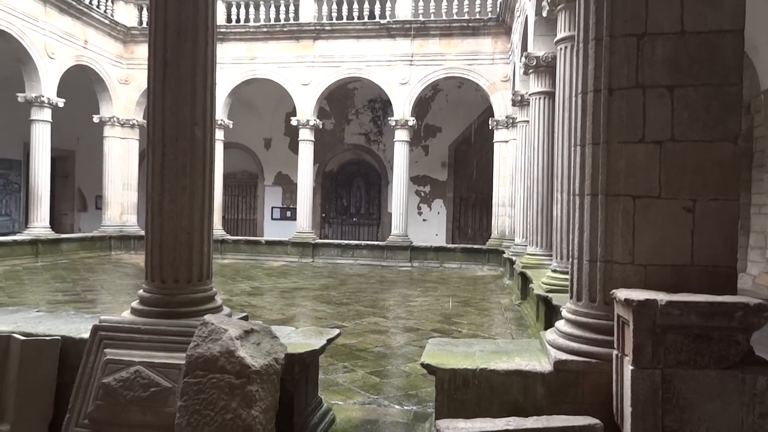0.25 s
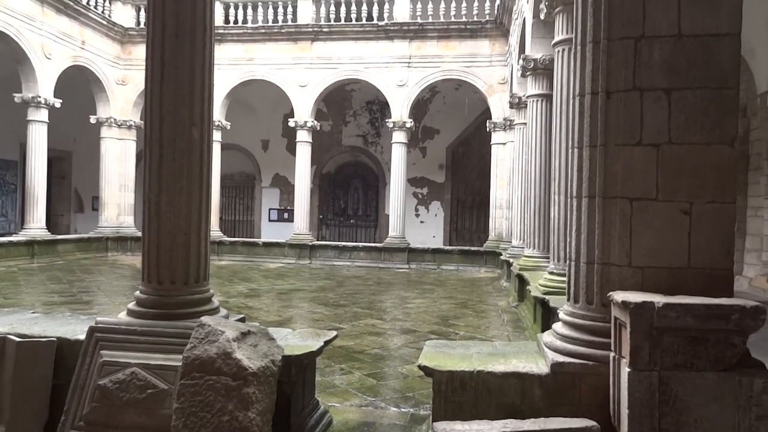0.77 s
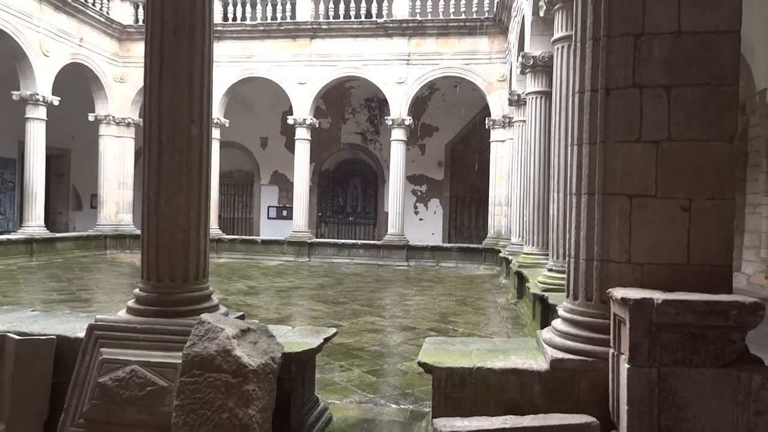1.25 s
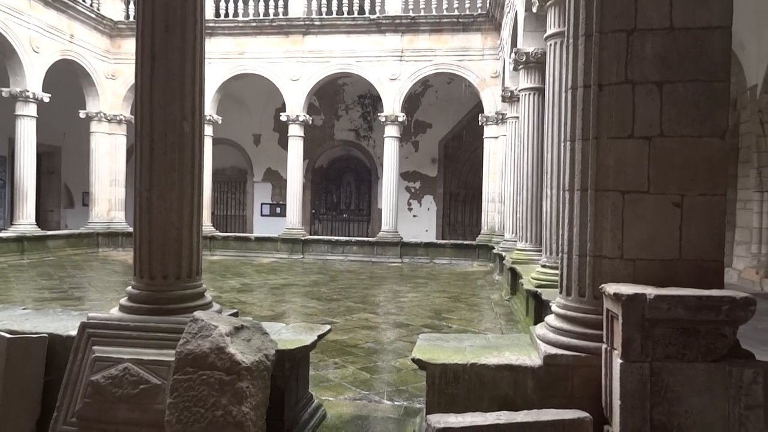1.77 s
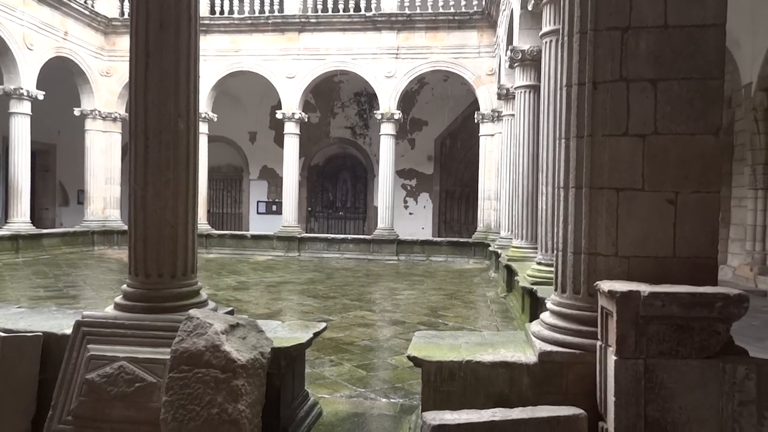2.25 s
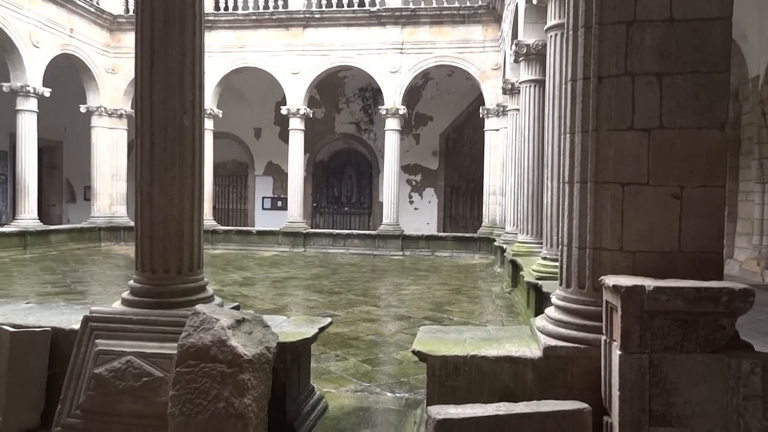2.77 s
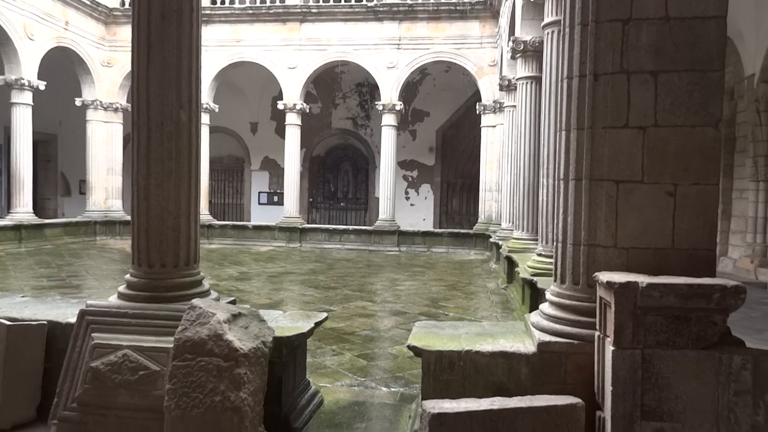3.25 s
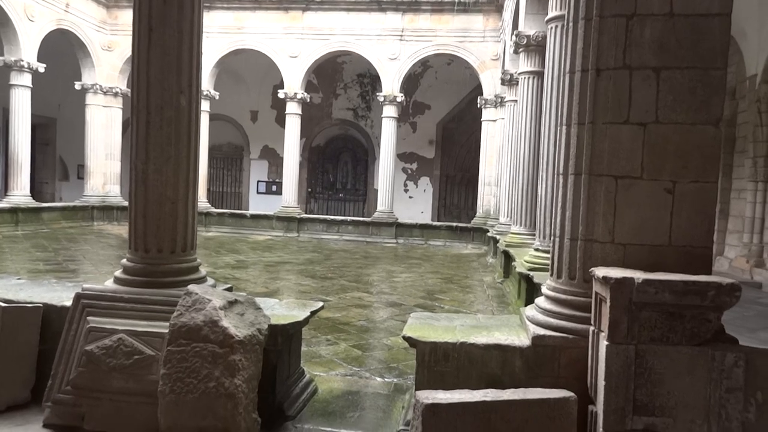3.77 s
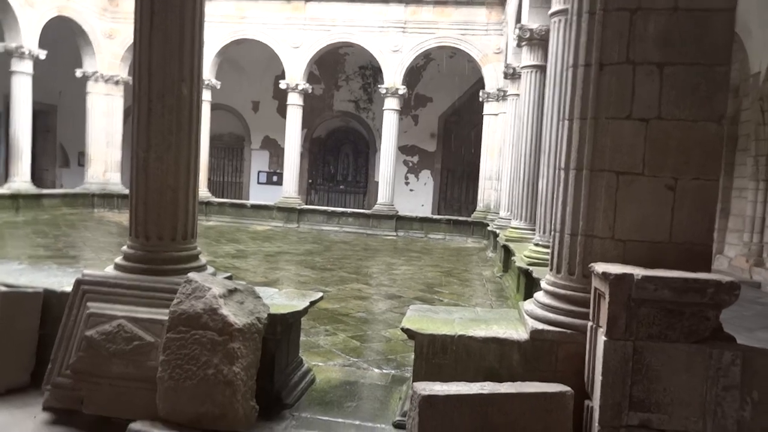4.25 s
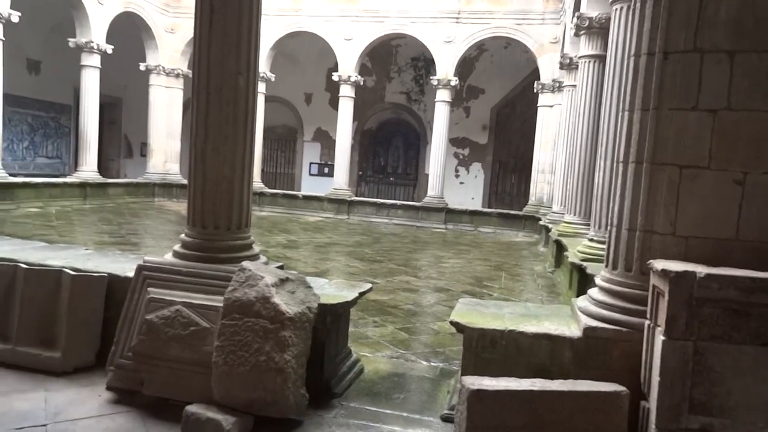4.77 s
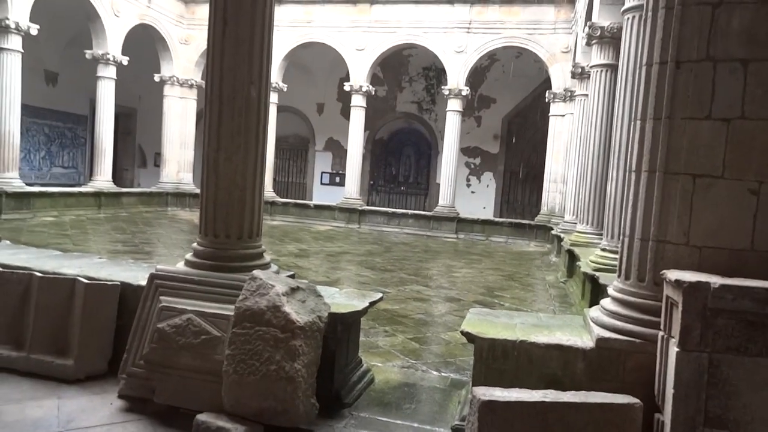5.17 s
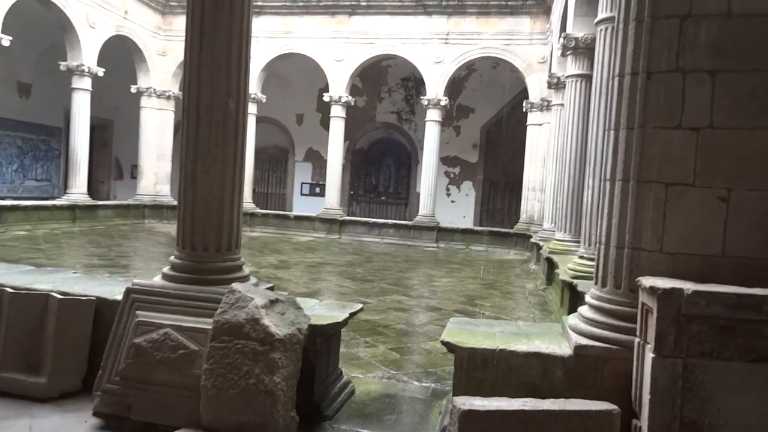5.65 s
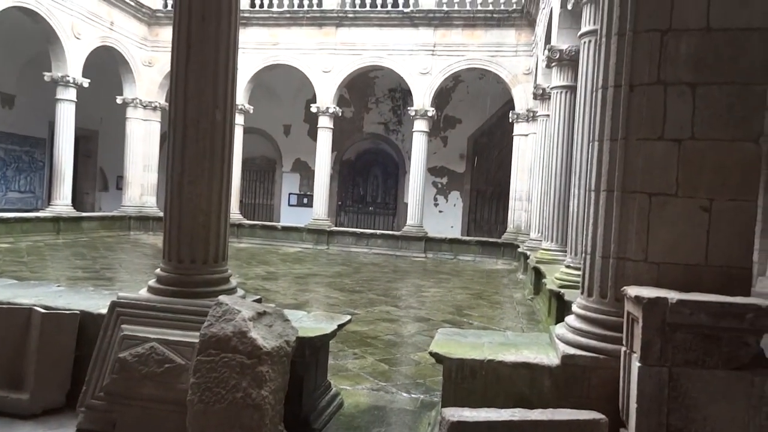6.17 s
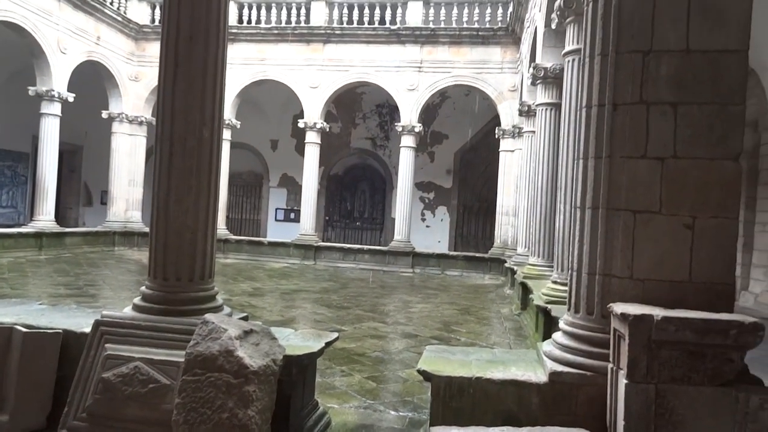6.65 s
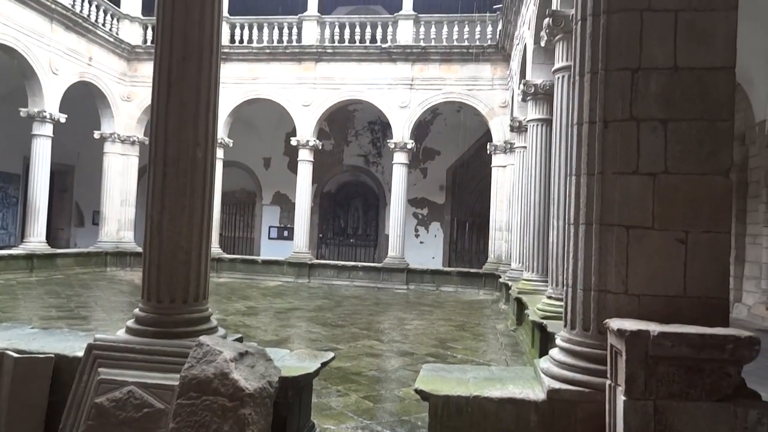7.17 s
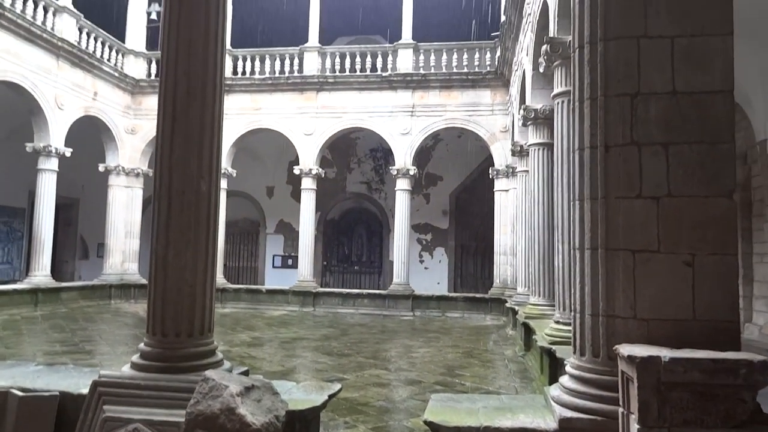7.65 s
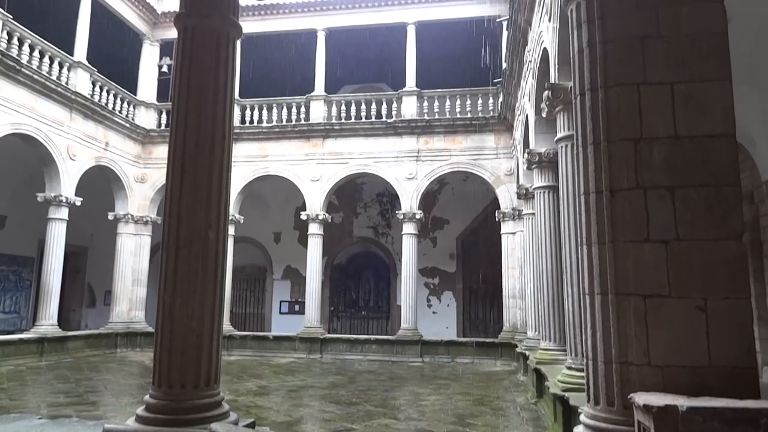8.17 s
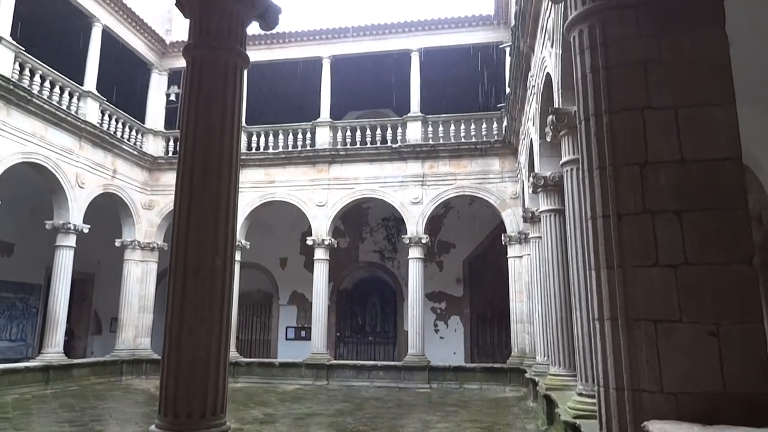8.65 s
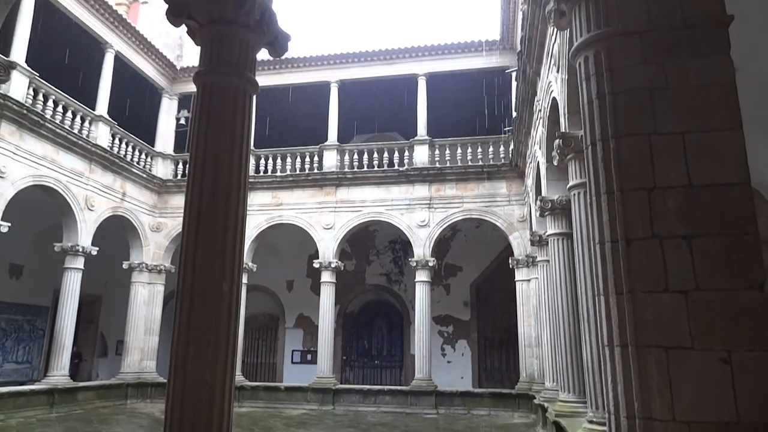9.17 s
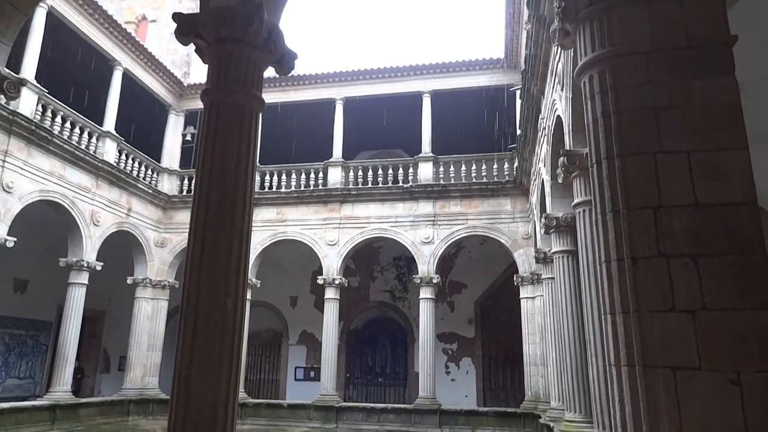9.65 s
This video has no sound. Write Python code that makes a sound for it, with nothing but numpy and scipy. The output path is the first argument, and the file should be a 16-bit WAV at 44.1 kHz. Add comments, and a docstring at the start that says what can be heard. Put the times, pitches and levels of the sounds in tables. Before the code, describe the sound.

From the shelter of an arcade around an open courtyard, rain makes a continuous bright wash, with a faint low rush of air beneath. Close drops click on stone and puddles, and runoff from the roof slaps down in clusters with a short echo. Halfway through, two quiet, quick knocks sound near the microphone, followed by a single hollow plop, and the rain carries on unchanged.

```python
"""A stone cloister in steady rain, heard from under the arcade. Countless far drops merge into a wash
over a low murmur of air, and near drops tick on the wet paving. Water spilling from the eaves slaps
down in clusters that ring round the walls. Midway comes one soft double bump close by, then a hollow
plop as a drop traps a bubble in a puddle."""
import sys
import numpy as np
from scipy import signal
from scipy.fft import rfft, irfft, next_fast_len
from scipy.io import wavfile
from scipy.ndimage import uniform_filter1d, map_coordinates

SR = 44100
rng = np.random.default_rng(int(sys.argv[2]) if len(sys.argv) > 2 else 0)


def file_out(sig):
    """Save sig as 16-bit WAV at sys.argv[1]."""
    # one column per channel
    cols = np.atleast_2d(sig).T
    # limit, then scale
    lim = np.clip(cols, -1, 1)
    pcm = np.round(lim * 32767).astype(np.int16)
    wavfile.write(sys.argv[1], SR, pcm)


N = 436590
TOP_HZ = 15900  # ceiling for drop pitches and for the whole mix


def amp(db):
    """Decibels to gain."""
    return 10 ** (np.asarray(db) / 20)


def unit(x):
    """Scale to rms 1."""
    return x / np.sqrt(np.mean(x ** 2) + 1e-20)


def along(points, hz):
    """Read a curve of (Hz, value) points on a log frequency axis."""
    freqs, values = np.transpose(points)
    return np.interp(np.log(hz + 1), np.log(freqs + 1), values)


def filtered(x, response):
    """Zero-phase EQ; response gives the gain at each frequency in Hz."""
    size = next_fast_len(N + SR // 2)
    return irfft(rfft(x, size) * response(np.fft.rfftfreq(size, 1 / SR)), size)[..., :N]


def wobble(rate):
    """A smooth random curve with rate knots a second."""
    knots = rng.standard_normal(int(N * rate / SR) + 4)
    return map_coordinates(knots, [np.arange(N) * rate / SR])


def rush(spectrum, patchy_db):
    """A stereo noise bed of rms 1, dappled with louder and softer patches in time and frequency."""
    # Stereo image. Each row: frequency in Hz, left-right likeness (1 is mono).
    likeness = [(60, 0.96), (99, 0.99), (160, 0.88), (270, 0.87), (450, 0.82), (740, 0.86), (1220, 0.97),
                (2010, 0.99), (3330, 0.93), (5500, 0.9), (9080, 0.93), (15000, 0.99)]

    def mid_side_gains(hz):
        width = np.arccos(np.clip(along(likeness, hz), -1, 1)) / 2
        return amp(along(spectrum, hz)) * [np.cos(width), np.sin(width)]

    frames = signal.stft(rng.standard_normal((2, N)), nperseg=512)[2]
    patches = uniform_filter1d(rng.standard_normal(frames.shape[1:]), size=12, axis=0)
    patches = uniform_filter1d(patches, size=10, axis=1)
    noise = signal.istft(frames * amp(patchy_db * unit(patches)))[1][:, :N]
    mid, side = filtered(noise, mid_side_gains)
    return unit(np.array([mid + side, mid - side]))


def courtyard_air():
    """The low, even murmur of air that fills the courtyard."""
    # Tone of the murmur. Each row: frequency in Hz, relative level in dB.
    spectrum = [(12, -41), (20, -11.5), (108, -1.5), (236, 0), (524, -1.5), (900, -3.5), (1170, -14),
                (1980, -120)]
    return amp(-48.0) * rush(spectrum, patchy_db=1.0)


def rainfall(flutter_per_s=15):
    """A dB curve for each drop size: the rain swells and eases, and the number of drops varies by chance."""
    # The rain's swells. Each row: time in seconds, strength in dB.
    swells = [(0, 1), (0.55, -0.5), (1.3, 1.4), (2.3, -0.3), (2.6, 1.6), (2.95, -0.8), (3.4, 1.3),
              (4.2, 0.1), (4.65, -0.2), (5.2, 0), (5.8, -0.1), (6.4, 0.7), (6.8, 0), (7.4, 0.7),
              (8.2, -0.6), (9, 0.8), (9.9, 1.3)]
    # Heavy drops in puddles, drops on stone, small drops, fine spray.
    # Each row: base level in dB, dB gained per dB of strength, own flutter in dB.
    drop_sizes = [(-31.5, 1, 0.3), (-26.5, 1.2, 0.12), (-29.5, 1, 0.78), (-33, 0.4, 1)]
    strength_db = np.interp(np.arange(N) / SR, *np.transpose(swells))
    shared_flutter_db = 0.35 * wobble(flutter_per_s)
    return [db + follows * strength_db + shared_flutter_db + flutter_db * wobble(flutter_per_s)
            for db, follows, flutter_db in drop_sizes]


def far_rain(levels):
    """Far drops merge into a wash: the smaller the drops, the higher their band of the hiss."""
    # Crossovers in Hz between the bands of the four drop sizes.
    crossovers = [2800, 5500, 9500]
    # Tone of the wash before each band gets its level. Each row: frequency in Hz, relative level in dB.
    spectrum = [(290, -40), (500, -22.5), (972, -13), (2450, 0), (3670, -2), (12400, -7), (14900, -9),
                (15800, -18)]
    wash = rush(spectrum, patchy_db=0.5)
    highpasses = [lambda hz, edge=edge: 1 - 1 / (1 + (hz / edge) ** 8) for edge in crossovers]
    above = [np.ones_like, *highpasses, np.zeros_like]
    bands = [filtered(wash, lambda hz: low(hz) - high(hz)) for low, high in zip(above, above[1:])]
    trims_db = [-3.5, -2.5, -3.0, -4.0]
    return sum(amp(level + trim) * unit(band) for level, trim, band in zip(levels, trims_db, bands))


def impacts(times, gains, pitch_hz, decay_cycles, rise_cycles=0.16, highpass_hz=1200):
    """Each drop is a sine that swells and dies within a few cycles, placed a little left or right."""
    offsets = np.arange(256)
    cycles = np.clip(pitch_hz, 1, TOP_HZ)[:, None] * offsets / SR
    attack = 1 - np.exp(-(cycles / rise_cycles) ** 2)
    waves = np.sin(2 * np.pi * cycles) * np.exp(-cycles / decay_cycles) * attack
    waves *= (gains / np.abs(waves).max(axis=1))[:, None]
    where = (np.abs(times) * SR).astype(int)[:, None] + offsets
    pan_db = 0.5 * rng.standard_normal((len(times), 1))
    pair = [np.bincount(where.ravel(), (waves * amp(side * pan_db)).ravel(), N)[:N] for side in (-1, 1)]
    # so small a source radiates no bass
    return signal.lfilter(*signal.butter(2, highpass_hz, "high", fs=SR), pair)


def shower(per_s, pitch_hz, spread, decay_cycles, scatter_db):
    """Drops at random moments, rms 1; the few that land close stand out."""
    moment, distance, detune = rng.random((int(per_s * N / SR), 3)).T
    gains = amp(-scatter_db * np.log(distance + 0.004))
    pitches = pitch_hz * np.exp(spread * (2 * detune - 1))
    return unit(impacts(moment * N / SR, gains, pitches, decay_cycles))


def near_rain(levels):
    """Single drops in earshot: plops in puddles, taps on stone, small ticks and pinpoint spray."""
    puddle_db, stone_db, small_db, spray_db = levels
    plops = shower(per_s=400, pitch_hz=2736, spread=0.364, decay_cycles=4.1, scatter_db=0.5)
    taps = shower(per_s=800, pitch_hz=4230, spread=0.44, decay_cycles=1.5, scatter_db=3.0)
    ticks = shower(per_s=700, pitch_hz=7200, spread=0.35, decay_cycles=0.98, scatter_db=2.9)
    spray = shower(per_s=1100, pitch_hz=11600, spread=0.18, decay_cycles=1.4, scatter_db=3.5)
    return (amp(puddle_db - 10.5) * plops + amp(stone_db - 7.0) * taps
            + amp(small_db - 7.0) * ticks + amp(spray_db - 3.5) * spray)


def eave_spills(drops_each=90, lowest_hz=1700):
    """A rope of water breaks into a burst of like drops, thickest at first, which the cloister prolongs."""
    # Spills from the eaves. Each row: start in seconds, typical drop level in dB, centre pitch in Hz,
    # time spread in seconds, pitch scatter as a log ratio.
    spills = [(0.093, -22, 4400, 0.066, 0.12), (0.148, -30, 2310, .045, 0.23), (0.29, -29, 4500, 0.082, .6),
              (0.56, -24.5, 4500, .1, 0.29), (1.03, -19.5, 6690, .13, .16),
              (1.159, -30.5, 2650, .012, 0.091), (1.255, -26, 11000, 0.043, .12),
              (1.403, -23, 4570, 0.037, .22), (1.556, -25, 3220, .085, .2),
              (1.798, -21.5, 4300, 0.017, 0.087), (1.838, -20.5, 4030, .07, .15),
              (2.33, -28, 9000, 0.028, .4), (2.556, -32.5, 2170, .11, .16), (3.232, -26, 5570, .037, .5),
              (3.45, -21.5, 4570, .13, .42), (3.663, -22, 6830, 0.054, 0.11), (3.76, -28, 8500, .02, .35),
              (4.029, -23, 3900, .13, 0.26), (4.208, -27.5, 3030, .099, .24),
              (4.811, -24.5, 5700, .043, 0.11), (5.074, -21.5, 6200, 0.14, 0.37),
              (5.553, -24.5, 3750, .07, 0.16), (6.129, -29.5, 3400, 0.047, .3),
              (6.419, -29, 2560, 0.052, .14), (6.96, -28, 11000, .06, .2), (7.388, -26, 8630, .012, 0.52),
              (7.524, -25, 12560, .037, .12), (7.63, -26, 3700, .05, .24), (7.85, -30, 2850, 0.065, 0.32),
              (8.333, -22, 7250, .056, 0.51), (8.695, -24.5, 4600, .018, .22), (8.75, -22, 4300, .12, 0.33),
              (8.879, -27, 3000, .025, 0.32), (8.959, -30.5, 2200, 0.06, .14),
              (9.352, -26, 2720, 0.083, 0.34), (9.815, -25, 2810, .14, .21)]
    start, db, hz, time_spread, scatter = np.transpose(spills)[:, :, None]
    delay, size, detune = rng.standard_normal((len(spills), 3, drops_each)).transpose(1, 0, 2)
    times = start + time_spread * np.abs(delay)
    gains = amp(db + 2 * size)
    pitches = np.maximum(hz * np.exp(scatter * 2 * np.tanh(detune / 2)), lowest_hz)
    bursts = impacts(times.ravel(), gains.ravel(), pitches.ravel(), decay_cycles=2.22, rise_cycles=0.53)
    return bursts + amp(3.0) * cloister_reverb(bursts)


def cloister_reverb(x):
    """The stone walls answer with a diffuse tail whose treble dies first."""
    # Ring of the walls. Each row: frequency in Hz, seconds to fall 60 dB.
    decay_times = [(300, 2.2), (3000, 1.77), (7000, 1.9), (14000, 0.66)]
    hz, t, frames = signal.stft(rng.standard_normal((2, SR)), SR, nperseg=256)
    decay = amp(-60 * t / along(decay_times, hz)[:, None])
    mid, side = signal.istft(frames * decay)[1]
    tail = mid + amp(-14) * np.array([side, -side])
    return signal.fftconvolve(x, tail / np.linalg.norm(tail[0]), axes=1)[:, :N]


def nearest_drops(decay_s=0.00026):
    """Fat drops by the arcade's edge flatten with a rounded click; the stone beside them throws it back."""
    # The closest drops. Each row: start in seconds, level in dB, pitch in Hz.
    drops = [(0.0986, -7, 4020), (0.1485, -4, 3380), (0.1919, -7, 4430), (0.6817, -6, 2810),
             (1.0005, -5, 6190), (1.2368, -7, 3430), (1.2518, -4, 3820), (1.7992, -6, 4370),
             (1.8238, -5, 4500), (1.9828, -6, 4960), (2.3898, -5, 3240), (2.5171, -5, 4350),
             (3.0378, -8, 3610), (3.4468, -5, 4580), (3.5458, -6, 3030), (3.6026, -5, 4340),
             (3.6638, -4, 5700), (4.8508, -6, 3230), (5.0948, -7, 6310), (5.3108, -6, 2500),
             (6.0341, -5, 4180), (7.1625, -4, 5250), (7.3848, -6, 3390), (7.6938, -6, 3520),
             (8.3698, -8, 2740), (8.6935, -6, 3720)]
    start, db, hz = np.transpose(drops)
    decay_cycles = decay_s * hz[:, None]
    click = impacts(start, amp(db - 0.5), hz, decay_cycles, rise_cycles=0.45, highpass_hz=1800)
    echo_start = start + rng.uniform(0.0008, 0.002, len(start))
    echo = impacts(echo_start, amp(db - 8), hz, decay_cycles, rise_cycles=0.7, highpass_hz=1800)
    return click + echo


def double_bump(attack_s=0.006):
    """Two soft, dull knocks in quick succession, each a few low modes that die fast."""
    # The knocks. Each row: start in seconds, level in dB.
    knocks = [(4.355, -36), (4.402, -38.5)]
    # Their ring. Each row: frequency in Hz, relative level in dB, seconds to fall 60 dB.
    modes = [(150, 0, 0.12), (323, 2, 0.084), (405, 4, 0.073)]
    out = np.zeros(N)
    for start, db in knocks:
        t = np.maximum(np.arange(N) / SR - start, 0)
        ring = sum(amp(level - 60 * t / t60) * np.sin(2 * np.pi * hz * t) for hz, level, t60 in modes)
        out += amp(db) * ring * (1 - np.exp(-t / attack_s))
    return out


def hollow_plop(start_s=5.032, db=-31, hz=880, t60_s=0.035):
    """One drop traps a large bubble in a puddle; its pitch rises as it dies."""
    t = np.maximum(np.arange(N) / SR - start_s, 0)
    phase = 2 * np.pi * hz * t * (1 + 0.2 * t / t60_s)
    return amp(db - 60 * t / t60_s) * np.sin(phase)


def scene():
    """A bed of air and rain, with the close drops, spills, bump and plop on top."""
    levels = rainfall()
    bed = courtyard_air() + far_rain(levels) + near_rain(levels)
    return bed + nearest_drops() + eave_spills() + double_bump() + hollow_plop()


def record(dry):
    """A brick-wall low-pass takes off the very top of the treble."""
    return filtered(dry, lambda hz: hz < TOP_HZ)


dry = scene()
out = record(dry)
file_out(out)
```